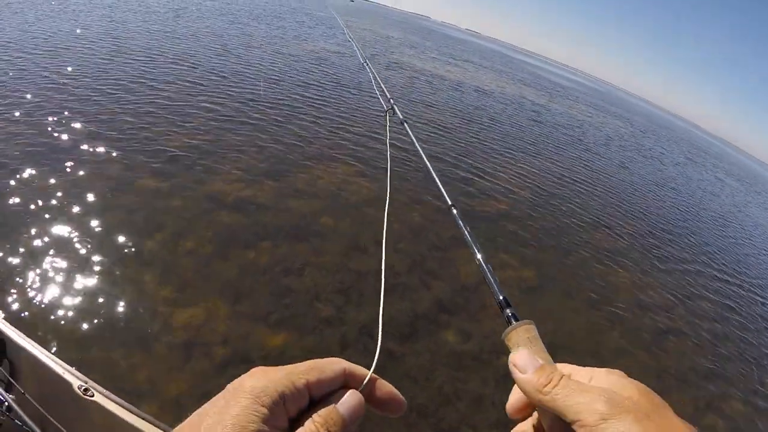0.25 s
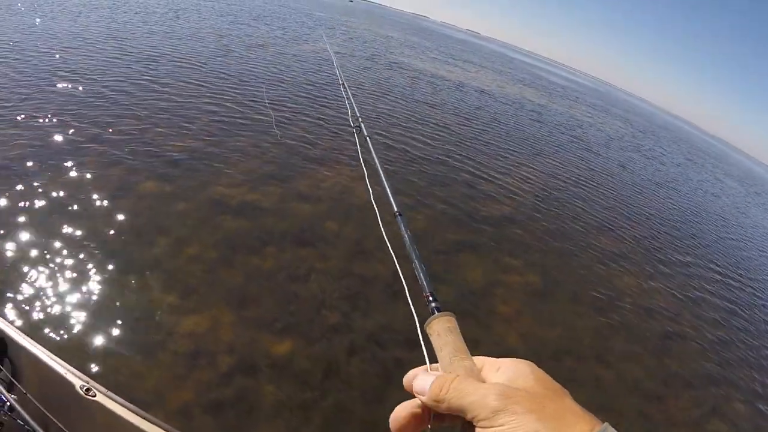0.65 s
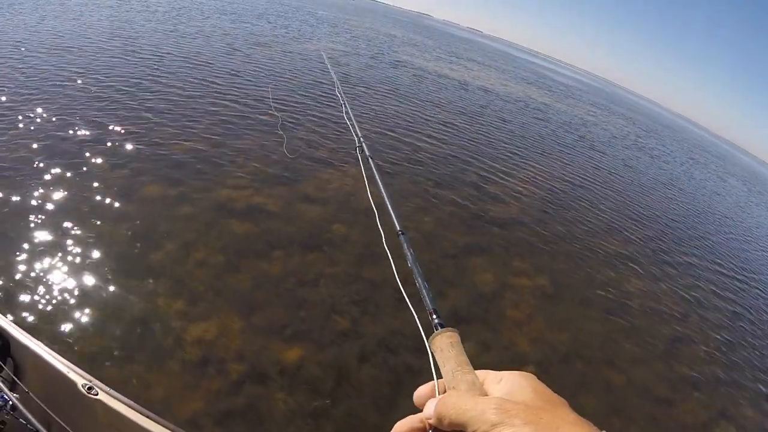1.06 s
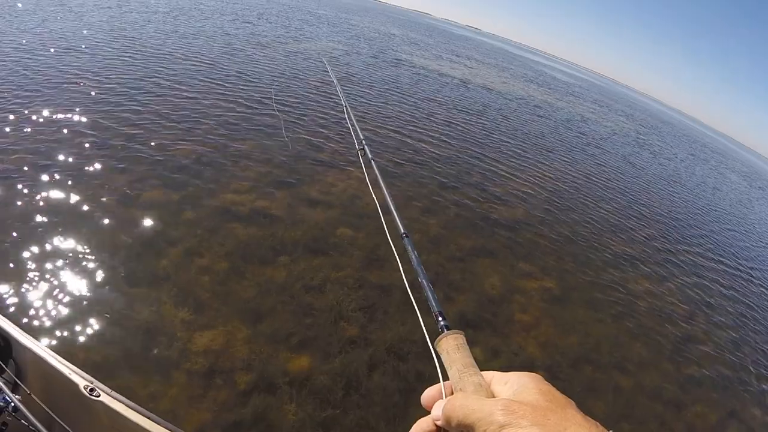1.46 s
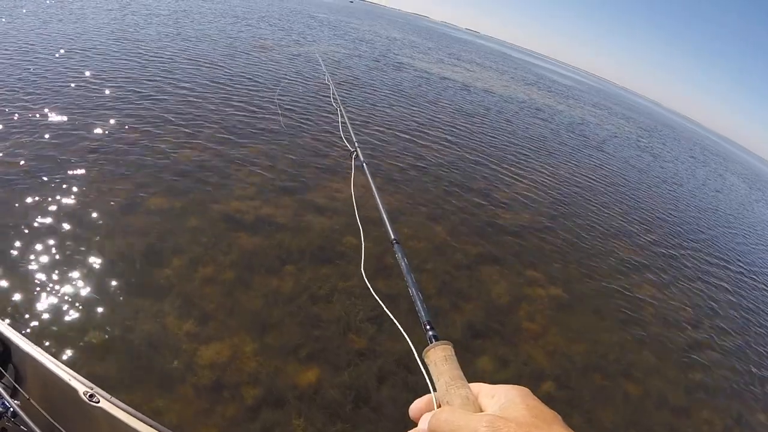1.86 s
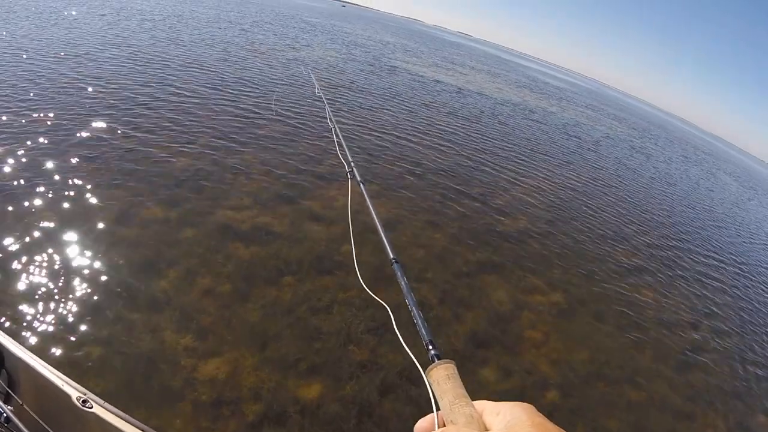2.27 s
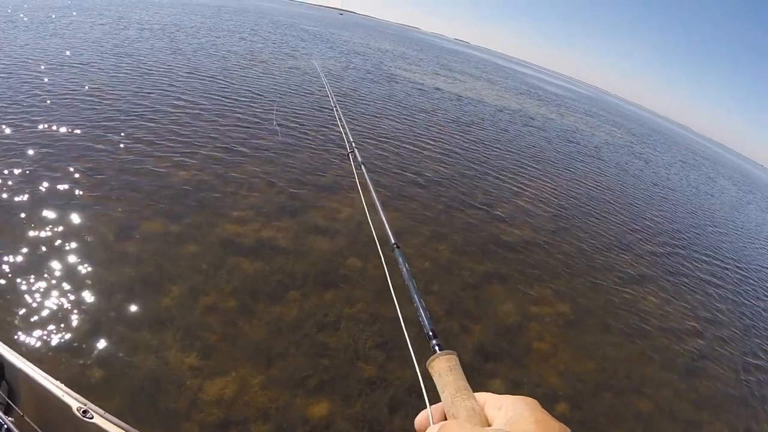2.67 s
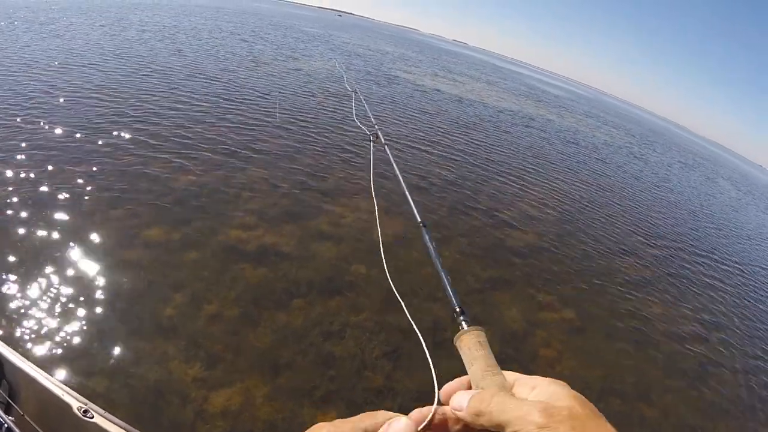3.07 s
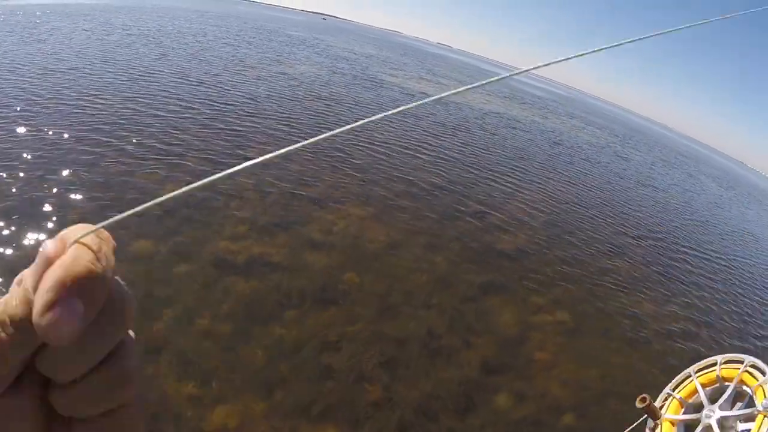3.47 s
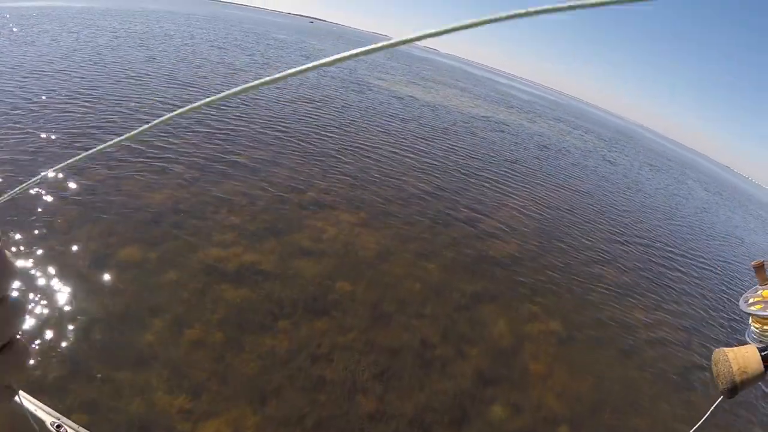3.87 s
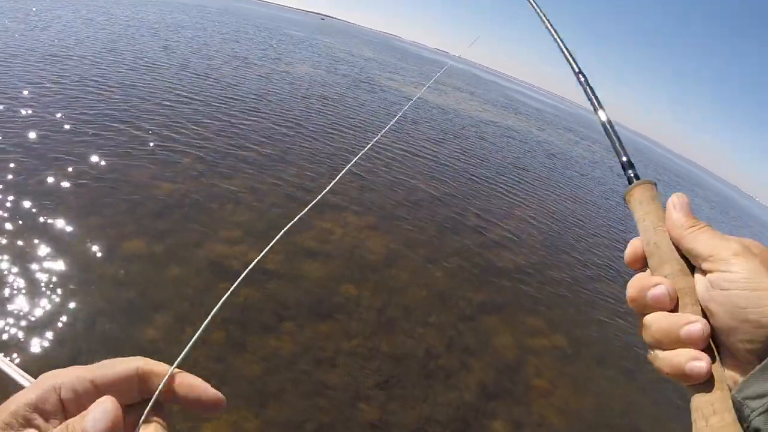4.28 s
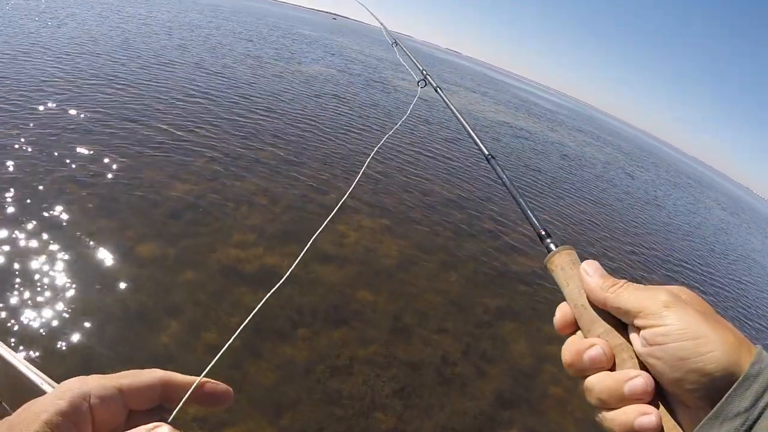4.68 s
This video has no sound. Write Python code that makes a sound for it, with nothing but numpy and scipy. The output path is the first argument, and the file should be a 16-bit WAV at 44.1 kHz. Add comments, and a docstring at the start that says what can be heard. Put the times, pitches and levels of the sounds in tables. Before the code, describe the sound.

A low gust of breeze fades as loose fly line brushes softly against a rod and small ripples plip at a boat. The line is pulled over the fingers three times, each a close, hissing zip that rises and falls with tiny squeals. A louder, climbing zip and a soft rod whoosh mark the back cast, then the line shoots forward in a sustained buzzing hiss. Light wind drones throughout.

```python
"""First comes a low gust of breeze, with loose fly line brushing a rod and ripples plipping at a boat.
A fisherman pulls in line three times, hauls it into a back cast and shoots it forward.
The line has tiny ribs. It hisses over his fingers and the rod's guide rings, and the ribs sing
a zip that gets higher as the line runs faster. Running line gives short squeals, slack line taps
the rod, and the swinging rod whooshes. The breeze drones around the boat throughout."""
import sys
import numpy as np
from scipy import signal
from scipy.fft import rfft, irfft, next_fast_len
from scipy.io import wavfile
from scipy.ndimage import uniform_filter1d

SR = 44100
rng = np.random.default_rng(int(sys.argv[2]) if len(sys.argv) > 2 else 0)


def to_wav(sig):
    """Store sig (one row per channel, or 1-D mono) as 16-bit WAV at the path in sys.argv[1].

    Samples outside -1..1 are clipped; the rate is SR.
    """
    pcm = np.clip(np.atleast_2d(sig), -1, 1) * 32767
    pcm = np.round(pcm).astype(np.int16)
    wavfile.write(sys.argv[1], SR, pcm.T)  # frames by channels


N = 217608
SIZE = next_fast_len(N, True)
TIME, HZ = np.arange(N) / SR, np.fft.rfftfreq(SIZE, 1 / SR)


def gain_of(db):
    """Turns decibels into a number to multiply a sound by."""
    return 10 ** (np.asarray(db) / 20)


def evened(x):
    """Scales x to an average power of one."""
    return x / np.sqrt(np.mean(abs(x) ** 2) + 1e-20)


def follow(rows):
    """Joins timed rows with straight lines, giving a value for every sample."""
    s, *columns = np.transpose(rows)
    return [np.interp(TIME, np.sort(s), c) for c in columns]


def shape(points):
    """Joins (Hz, dB) points into a gain for every frequency."""
    hz, db = np.transpose(points)
    return gain_of(np.interp(np.log(HZ + 1), np.log(hz), db))


def bell(hz, width_hz):
    """The gain of one resonance: a hump around one frequency."""
    return 1 / (1 + (2 * (HZ - hz) / width_hz) ** 2)


def coloured(x, gain):
    """Turns each frequency of x up or down by its gain."""
    return irfft(rfft(x, SIZE) * gain, SIZE)[:N]


def noise(gain):
    """Noise with the given colour (its balance of low and high) and a power of one."""
    return evened(coloured(rng.standard_normal(N), gain))


def wander(rate_hz):
    """A smooth random wobble, up to about the given rate."""
    return noise(1 / (1 + (HZ / rate_hz) ** 4))


def flicker(depth_db, rate_hz):
    """A gain that wobbles up and down by at most the given depth."""
    return gain_of(depth_db * np.tanh(wander(rate_hz)))


def add(mix, s, sound):
    """Mixes a short sound in at s seconds."""
    part = mix[max(round(s * SR), 0):][:len(sound)]
    part += sound[:len(part)]


# The colours of the airy wash and of the gust. Each row: frequency in Hz, relative level in dB.
WASH_COLOUR = [(20, -34), (100, -94), (135, 3.5), (230, 0), (330, -5.5), (550, -10), (1000, -18),
               (1800, -24), (3500, -30), (4400, -45), (5800, -35.5), (6800, -30.5), (8500, -30),
               (11000, -36), (15200, -43)]
GUST_COLOUR = [(15, -11), (55, -6.5), (130, -18), (1000, -80)]
# The drone's notes, deepest first. Each row: pitch in Hz, width in Hz, relative level in dB.
DRONE_NOTES = [(154.3, 37, -0.5), (178.8, 55, -6), (230.5, 27, -8.5)]
# The deepest note eases near the end. Each row: time in seconds, relative level in dB.
DEEP_NOTE_LEVELS = [(0.0, -49.5), (3.9, -50), (4.2, -52.5), (4.93, -52.5)]

def breeze(wash_db=-50, drone_db=-50, deep_trim_db=-0.5, gust_db=-52, fall_db_per_s=9, flutter_db=-72.5):
    """Wind washes and drones around the boat, while a low gust dies down to a light flutter."""
    wash = gain_of(wash_db + .5 * wander(22)) * noise(shape(WASH_COLOUR))
    deep, *upper = (gain_of(db) * noise(bell(hz, width) ** 2) for hz, width, db in DRONE_NOTES)
    deep_db, = follow(DEEP_NOTE_LEVELS)
    drone = gain_of(deep_db + deep_trim_db) * deep + gain_of(drone_db) * sum(upper)
    gust = np.hypot(gain_of(gust_db - fall_db_per_s * TIME), gain_of(flutter_db))
    return wash + drone + gust * noise(shape(GUST_COLOUR))


# The lapping slowly grows, then eases a little. Each row: time in seconds, level in dB.
LAPPING_LEVELS = [(1.0, -78), (2.0, -65.5), (3.8, -58.5), (4.9, -61)]
# The colour of the water's fizz. Each row: frequency in Hz, relative level in dB.
FIZZ_COLOUR = [(300, -30), (800, 11.5), (2200, 6.5), (4000, -9), (8000, 2), (15000, -15)]

def lapping(grain_db=3):
    """Tiny waves fizz faintly around the hull."""
    level_db, = follow(LAPPING_LEVELS)
    return gain_of(level_db + grain_db * wander(106)) * noise(shape(FIZZ_COLOUR))


# Near ripples at the hull. Each row: start in seconds, relative level in dB, starting pitch in Hz.
NEAR_RIPPLES = [(0.527, -36.5, 1440), (1.1827, -48, 1620), (1.248, -41, 950), (1.6355, -42, 1380),
                (3.644, -40, 358)]

def ripples(ring_cycles=3.4, splat_s=0.0028, plip_db=-2, rise=4, splash_db=3, faint_count=45):
    """Each ripple splats and leaves a bubble that rings and rises. Big, low bubbles ring longest."""
    bubbles, splats, t = np.zeros(N), np.zeros(N), TIME[:2500]
    faint = [(when * TIME[-1], -63 + 9 * loud, 500 * 5 ** high)
             for when, loud, high in rng.random((faint_count, 3))]
    for s, db, hz in list(NEAR_RIPPLES) + faint:
        attack = gain_of(db) * (1 - np.exp(-t / 0.00063))
        rising_tone = np.sin(2 * np.pi * hz * t * (1 + rise * t))
        add(bubbles, s, attack * np.exp(-t * hz / ring_cycles) * rising_tone)
        add(splats, s, attack * np.exp(-t / splat_s) * rng.standard_normal(len(t)))
    return gain_of(plip_db) * bubbles + gain_of(splash_db) * coloured(splats, bell(1600, 1300) ** 2)


# The rod's back sweep. In order: middle and half width in seconds, level in dB, pitch and width in Hz.
ROD_SWEEP = (3.42, 0.06, -45.5, 215, 70)

def swish():
    """The swinging rod leaves swirls of air behind it: a soft, low whoosh."""
    s, half_s, db, hz, width_hz = ROD_SWEEP
    swell = np.exp(-.5 * ((TIME - s) / half_s) ** 2)
    return gain_of(db) * swell * noise(bell(hz, width_hz) ** 2)


# Light taps of line on the rod. Each row: start in seconds, relative level in dB.
LINE_TAPS = [(0.1172, -38.5), (3.102, -32), (3.127, -30), (4.194, -27)]

def taps(decay_s=0.0012, trim_db=-6):
    """Slack line flicks the rod and makes a short, bright tick."""
    ticks, t = np.zeros(N), TIME[:2000]
    for s, db in LINE_TAPS:
        add(ticks, s, gain_of(db + trim_db) * np.exp(-t / decay_s) * rng.standard_normal(len(t)))
    return coloured(ticks, bell(5700, 10600) ** 2)


# Short squeals of the running line. Each row: start and length in seconds, middle pitch in Hz,
# level in dB, glide in Hz per second, overtone in dB compared with the main tone.
LINE_SQUEAKS = [(1.339, 0.014, 3130, -45.5, 35000, -21), (1.368, 0.026, 3970, -44.5, 8000, -11),
                (1.477, 0.015, 5300, -47, -15000, -18), (1.903, 0.021, 3650, -43, 45000, -12),
                (1.949, 0.02, 2536, -48, 35000, 0), (1.972, 0.0373, 3470, -38.5, 10000, 0.5),
                (2.012, 0.042, 4980, -39.5, 13000, -28), (2.62, 0.024, 5090, -42, 15000, -14.5),
                (2.643, 0.021, 3290, -45, 10000, 3), (2.667, 0.023, 5070, -42, 0, -20),
                (2.74, 0.022, 5100, -49, -35000, -3), (3.003, 0.081, 4680, -57, -3000, -21),
                (3.08, 0.053, 4980, -45, 1006, -20), (3.395, 0.022, 5350, -25.5, 40000, -27),
                (3.433, 0.0071, 5490, -25.5, 8000, -33), (3.456, 0.012, 3346, -29, 35000, -10),
                (3.514, 0.021, 5480, -22.5, 3000, -26), (3.909, 0.0414, 1110, -58.5, 8011, 3.5)]

def squeaks(jitter=0.023):
    """The line squeals briefly, sometimes at the fingers, loudest where the zip flares on a resonance."""
    out, waver, catching = np.zeros(N), wander(730), flicker(3, 340)
    for s, length, hz, db, glide, overtone_db in LINE_SQUEAKS:
        t = TIME[:int(length * SR)]
        now = int(s * SR) + np.arange(len(t))
        pitch_hz = (hz + glide * (t - length / 2)) * (1 + jitter * waver[now])
        phase = 2 * np.pi * np.cumsum(pitch_hz) / SR
        tone = np.sin(phase) + gain_of(overtone_db) * np.sin(2 * phase)
        add(out, s, gain_of(db) * np.sqrt(2) * np.hanning(len(t)) * evened(catching[now]) * tone)
    return out


def shifting(hiss, patch_hz=500, patch_s=0.018, depth_db=1.9, size=256):
    """The line shifts on the rings, so low and high patches of its hiss swell and fade separately."""
    frames = dict(nperseg=size, noverlap=size * 3 // 4)
    spectra = signal.stft(hiss, **frames)[2]
    patches = uniform_filter1d(rng.standard_normal(spectra.shape), round(patch_hz * size / SR), axis=0)
    patches = evened(uniform_filter1d(patches, round(patch_s * SR * 4 / size), axis=1))
    return evened(signal.istft(spectra * gain_of(depth_db * patches), **frames)[1][:N])


def friction(snags_per_s=700, snag_share=0.22, grain_db=-1.0, flutter_db=1.5):
    """Countless tiny slips hiss, and rarer snags crackle. The default settings are for tight line."""
    slips = evened(rng.standard_normal(N) * flicker(grain_db, 1200))
    snagged = rng.random(N) < snags_per_s / SR
    snags = evened(snagged * rng.choice([-1, 1], N) * rng.uniform(.3, 1, N))
    hiss = np.sqrt(1 - snag_share) * slips + np.sqrt(snag_share) * snags
    return shifting(hiss * flicker(flutter_db, 31))


# Peaks and dips that colour every rub, from the rod and the microphone together.
# Each row: frequency in Hz, width in Hz, boost or cut in dB.
RUB_PEAKS_AND_DIPS = [(2070, 130, -12.5), (2890, 60, 3.5), (3090, 70, 6), (3340, 70, 6), (3696, 110, 6),
                      (4365, 205, -8), (5070, 110, 8.5), (5430, 150, 6.5), (7470, 740, -10.5),
                      (10870, 430, 3), (11950, 800, -18)]

def rubbing(strength, colour, shaking):
    """The line's shaking, coloured by rod and microphone, is louder when the line is rubbed harder."""
    main_db = sum(db * bell(hz, width) for hz, width, db in RUB_PEAKS_AND_DIPS)
    # many small resonances lie between the main ones and make a gliding zip flutter
    small_hz = np.arange(0, SR / 2, 70)
    small_db = 1.8 * np.interp(HZ, small_hz, rng.standard_normal(len(small_hz)))
    return strength * coloured(shaking, evened(shape(colour) * gain_of(small_db + main_db)))


# The colours of line on the rod and on a finger. Each row: frequency in Hz, relative level in dB.
ON_ROD_COLOUR = [(600, -5.5), (2000, -3), (2500, 2), (3500, -7), (4600, -3.5), (5300, -28), (15000, -40)]
ON_FINGER_COLOUR = [(500, -11.5), (1900, -7.5), (2400, 4.5), (3300, 1), (5200, -2), (5850, -2.5),
                    (6200, 1.5), (7200, -1), (9500, -10), (11000, -5.5), (15000, -37)]
# Loose line brushing. Each row: middle and half width in seconds, level in dB, finger's share (0 to 1).
LOOSE_BRUSHES = [(0.05, 0.18, -64, 0.26), (0.29, 0.028, -59, 0.17), (0.4, 0.032, -56.5, 0.08),
                 (0.457, 0.028, -56.5, 0.11), (0.51, 0.056, -61.5, 0.03), (0.63, 0.054, -59.5, 0.1),
                 (0.68, 0.012, -55, 0.04), (0.705, 0.03, -62, 0), (0.8, 0.025, -62.5, 0),
                 (0.97, 0.099, -62.5, 0.27), (1.28, 0.059, -60, 0.56), (1.86, 0.038, -63, 0.97),
                 (2.264, 0.006, -61, 0.9), (2.41, 0.04, -61.5, 1), (2.9, 0.005, -63, 1)]

def brushes():
    """Loose line brushes the rod, or more brightly the finger, in rubs that swell and fade."""
    s, width, db, share = np.transpose(LOOSE_BRUSHES)[:, :, None]
    power = gain_of(db) ** 2 * np.exp(-((TIME - s) / width) ** 2)
    loose_hiss = friction(snags_per_s=170, snag_share=0.4, grain_db=-5.5, flutter_db=0.5)
    on_rod = rubbing(np.sqrt((power * (1 - share)).sum(0)), ON_ROD_COLOUR, loose_hiss)
    on_finger = rubbing(np.sqrt((power * share).sum(0)), ON_FINGER_COLOUR, friction())
    return on_rod + on_finger


def ribs_on_ring(rib_hz, overtones, jitter, fuzz_db):
    """The line chatters in a ring, so the tone of its ribs trembles in pitch and strength."""
    chatter = jitter * wander(400) + .012 * wander(70)
    phase = 2 * np.pi * np.cumsum(rib_hz * (1 + chatter)) / SR
    return evened(sum(gain_of(db) * flicker(fuzz_db, 230) * np.cos(k * phase)
                      for k, db in enumerate(overtones, 1)))


def running_line(rib_hz, zip_db, overtones, hiss_db, jitter, fuzz_db, brighten, stray, stutter_db):
    """Moving line hisses, and its ribs sing a zip as they pass the rings, rib_hz of them a second."""
    near = ribs_on_ring(rib_hz, overtones, jitter, fuzz_db)
    # the line sags between rings, so it passes the next one at a slightly different speed
    far = ribs_on_ring(rib_hz * (1 + stray * wander(60.43)), overtones, jitter, fuzz_db)
    # it also bounces on the rings, which breaks the tone up
    tone = evened((near + 0.5 * far) * flicker(stutter_db, 36))
    # a tight line sings more and scrapes less
    hiss = gain_of(hiss_db) * friction() / np.sqrt(1 + .5 * gain_of(zip_db) ** 2)
    shaking = hiss + gain_of(zip_db) * tone
    # faster slips are sharper: the treble grows with speed, and flickers as the line flaps
    treble = coloured(shaking, 1 - 1 / (1 + (HZ / 7500) ** 10))
    sharpness = (rib_hz / 3400) ** brighten * flicker(2.2, 30)
    return shaking + treble * (sharpness - 1)


def contact(t, length, attack_s, release_s):
    """A touch fades in from t = 0, holds, and is half faded out at the given length."""
    return np.clip(t / attack_s, 0, 1) * np.clip(.5 + (length - t) / release_s, 0, 1)


# The tones in a pull's zip. Each value: relative level in dB, from the main tone up.
PULL_OVERTONES = [0.65, 2.8, -0.76]
# Pulls of line over the finger. Each row: start, time to grip, time to top speed and length in seconds,
# relative level in dB, top speed in ribs per second, relative zip and pinch levels in dB.
LINE_PULLS = [(1.271, 0.092, 0.14, 0.3, -43.3, 4362, -13, -7),
              (1.893, 0.014, 0.137, 0.287, -40.3, 5250, -5, -6),
              (2.53, 0.045, 0.181, 0.305, -41.7, 4715, -6.5, 1.5)]

def pulls(surge_s=0.059, creep=0.18, taut_lead_s=0.036, taut_s=0.14, slack_loss_db=31):
    """The hand speeds the line up and slows it again. Pitch, loudness and brightness follow the speed."""
    rows = np.array(LINE_PULLS)
    nearest = abs(TIME[:, None] - rows[:, 0] - rows[:, 2]).argmin(1)
    start, grip, rise, length, db, top_hz, zip_db, pinch_db = rows[nearest].T
    from_top = TIME - start - rise
    speed = creep + (1 - creep) / (1 + (from_top / surge_s) ** 2)
    # the line is tightest, and sings most clearly, just before top speed
    taut = np.exp(-((from_top + taut_lead_s) / taut_s) ** 2)
    rib_hz = top_hz * speed * (1 + 0.014 * wander(37.7))  # it slips unevenly through the fingers
    # wet skin makes the zip rough: jitter, fuzz and stutter
    shaking = running_line(rib_hz, zip_db - slack_loss_db * (1 - taut), PULL_OVERTONES, hiss_db=-3.5,
                           jitter=0.023, fuzz_db=5.7, brighten=0.77, stray=0.065, stutter_db=5.5)
    # the pinch tightens and eases, so one resonance of the finger comes and goes
    pinch = gain_of(pinch_db) * flicker(6, 45) * coloured(shaking, bell(5270, 640))
    touching = contact(TIME - start, length, grip, release_s=0.08)
    return rubbing(gain_of(db) * speed ** 0.43 * touching, ON_FINGER_COLOUR, shaking + pinch)


def stroke(move, overtones, colour, zip_db, zip_db_per_octave, **texture):
    """One move of the cast. Below 3000 ribs a second, the zip fades by zip_db_per_octave."""
    rib_hz, rub_db = follow(move)
    slow_db = zip_db_per_octave * np.minimum(np.log2(rib_hz / 3000), 0)
    start, end = move[0][0], move[-1][0]
    touching = contact(TIME - start, end - start, attack_s=.01, release_s=.02)
    shaking = running_line(rib_hz, zip_db + slow_db, overtones, **texture)
    return rubbing(touching * gain_of(rub_db), colour, shaking)


# The tones in each move's zip. Each value: relative level in dB, from the main tone up.
HAUL_OVERTONES = [5.2, 3, 0, -6]
BACK_OVERTONES = [9, 8.5, 5.5, -1]
SHOOT_OVERTONES = [7, 10, -2]
# The colour of each move's rub. Each row: frequency in Hz, relative level in dB.
HAUL_RUB_COLOUR = [(500, -57), (1700, -17), (2700, -5), (3400, -6), (4000, -1), (4800, 3.5), (5900, 3.5),
                   (6700, -11.5), (10400, -7), (15000, -64)]
BACK_RUB_COLOUR = [(500, -9), (1500, -10), (2600, -1.5), (3400, -3), (5300, 6.5), (6300, -8), (8300, -3),
                   (11000, -5), (15000, -38)]
SHOOT_RUB_COLOUR = [(500, -46), (2000, -15), (2900, -5.5), (3800, -2.5), (5400, 2.5), (6400, -6),
                    (8000, -7.5), (9000, -18), (10600, -11), (15000, -41)]
# The line in each move. Each row: time in seconds, speed in ribs per second, relative level in dB.
HAUL_MOVE = [(3.04, 806, -60), (3.125, 931, -50.5), (3.165, 987, -56), (3.185, 1046, -45.5),
             (3.24, 1186, -40), (3.335, 1600, -37), (3.36, 1730, -40.5), (3.392, 2269, -39.5),
             (3.406, 2590, -42), (3.416, 2660, -41), (3.43, 2798, -43.5), (3.444, 2956, -37),
             (3.458, 3150, -42), (3.474, 4000, -35.5), (3.487, 4260, -40), (3.497, 5030, -41.5),
             (3.533, 5500, -43), (3.548, 4840, -44), (3.566, 4080, -37), (3.582, 2660, -50),
             (3.6, 1810, -50), (3.64, 886, -74)]
BACK_MOVE = [(3.65, 501, -57.5), (3.89, 621, -54.5), (3.92, 1022, -54), (3.97, 1610, -52.5),
             (3.994, 2150, -50), (4.0, 2360, -41), (4.007, 2550, -46), (4.017, 2720, -45),
             (4.026, 2780, -46), (4.033, 2700, -40), (4.041, 2470, -45), (4.049, 2690, -45.5),
             (4.063, 2886, -42.5), (4.083, 2520, -48.5), (4.11, 2700, -48), (4.125, 2250, -43),
             (4.155, 2270, -47), (4.165, 1986, -42.5), (4.19, 1966, -35.5)]
SHOOT_MOVE = [(4.185, 2290, -57), (4.2, 2743, -38.5), (4.218, 3430, -43), (4.25, 4250, -38),
              (4.3, 3700, -33), (4.35, 3620, -37.5), (4.39, 3290, -36), (4.44, 3730, -35.5),
              (4.5, 4060, -37.5), (4.6, 3884, -36.5), (4.622, 4100, -41), (4.65, 3580, -35.5),
              (4.68, 3500, -37.5), (4.72, 4070, -39), (4.755, 3940, -40.5), (4.8, 4060, -35.5),
              (4.84, 3900, -40), (4.885, 3560, -39), (4.93, 3300, -60)]

def cast():
    """The line zips through the rings as it is hauled, runs out behind and shoots forward."""
    haul = stroke(HAUL_MOVE, HAUL_OVERTONES, HAUL_RUB_COLOUR, zip_db=1.2, zip_db_per_octave=5,
                  hiss_db=0, jitter=0.023, fuzz_db=5.8, brighten=1.05, stray=0.045, stutter_db=4)
    back = stroke(BACK_MOVE, BACK_OVERTONES, BACK_RUB_COLOUR, zip_db=-4, zip_db_per_octave=3,
                  hiss_db=-6.5, jitter=0.022, fuzz_db=6.2, brighten=0.052, stray=0.055, stutter_db=4)
    shoot = stroke(SHOOT_MOVE, SHOOT_OVERTONES, SHOOT_RUB_COLOUR, zip_db=-8.3, zip_db_per_octave=0,
                   hiss_db=-3.5, jitter=0.014, fuzz_db=5.7, brighten=0.78, stray=0.06, stutter_db=5)
    return haul + back + shoot


def scene():
    """Line, rod, water and wind, added into one channel."""
    fishing = brushes() + pulls() + cast() + swish() + squeaks() + taps()
    return (fishing + ripples() + lapping() + breeze())[None]


def record(dry, mirror_db=-9, mirror_hz=12000, edge_hz=15250):
    """Treble just below mirror_hz gets a faint mirror image above it, and all above edge_hz is cut."""
    band = bell(mirror_hz, 6000) ** 2 * (HZ < mirror_hz) * (HZ > 2 * mirror_hz - edge_hz)
    treble = signal.hilbert(coloured(dry[0], band))
    image = (treble.conj() * np.exp(2j * np.pi * 2 * mirror_hz * TIME)).real
    low_pass = signal.firwin(1023, edge_hz, window=("kaiser", 9), fs=SR)
    return signal.oaconvolve(dry + gain_of(mirror_db) * image, low_pass[None], "same")


dry = scene()
out = record(dry)
to_wav(out)
```